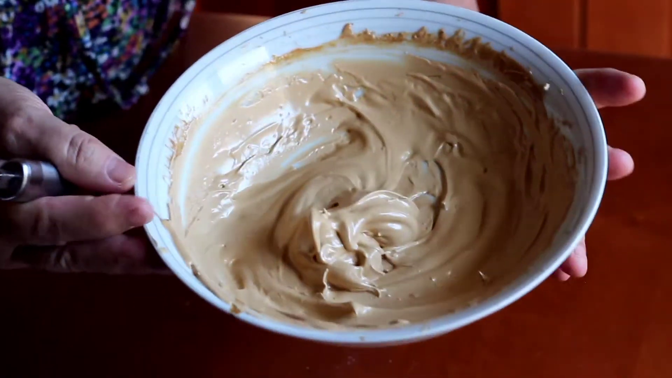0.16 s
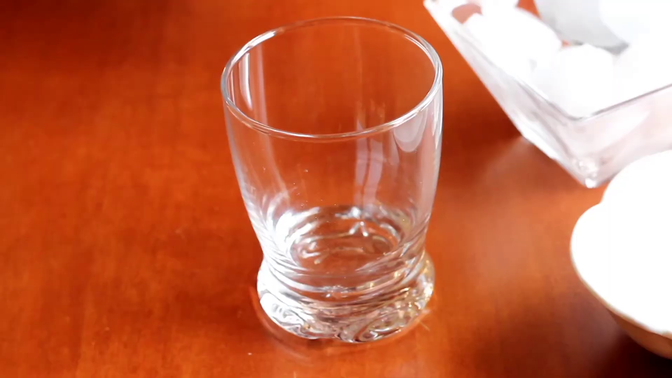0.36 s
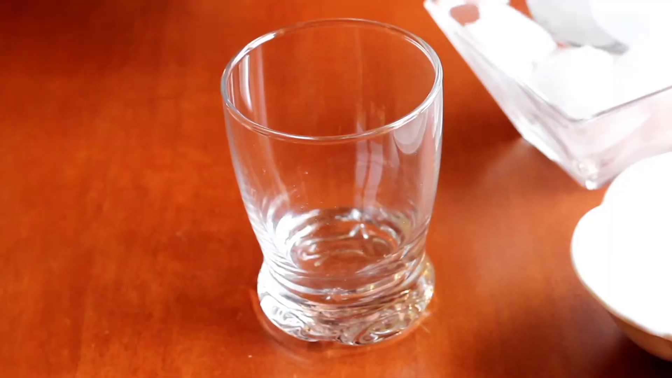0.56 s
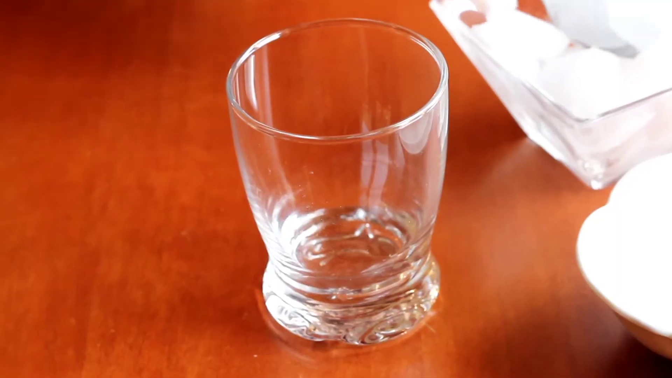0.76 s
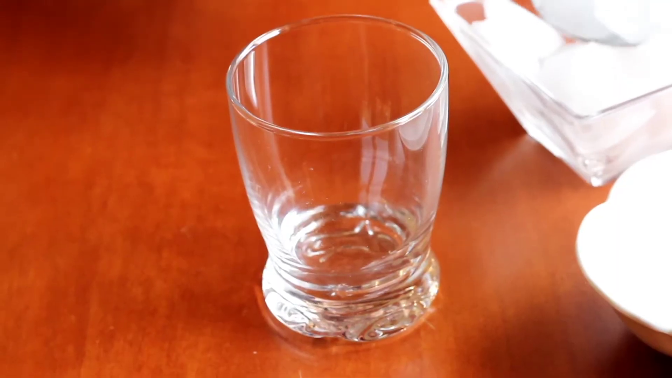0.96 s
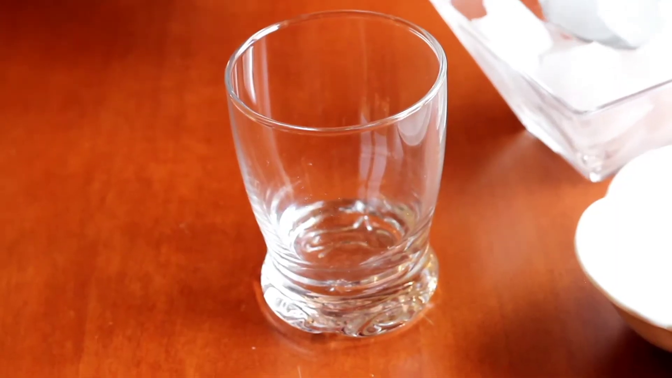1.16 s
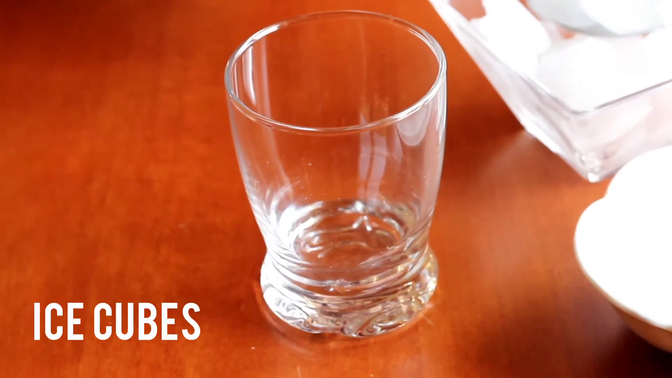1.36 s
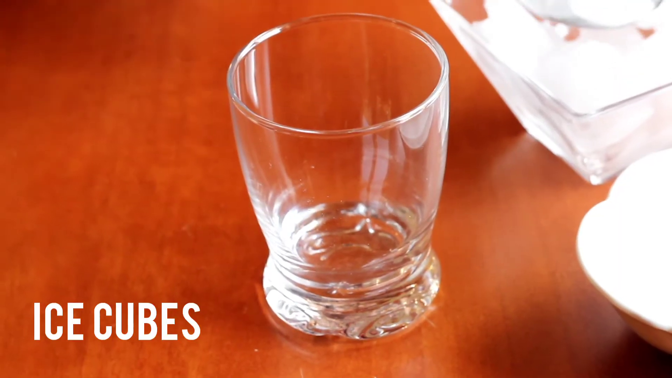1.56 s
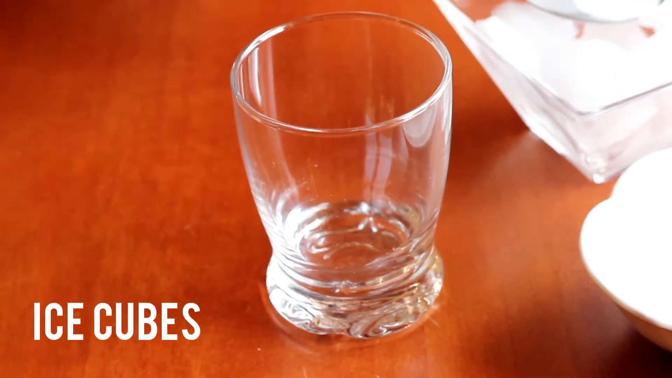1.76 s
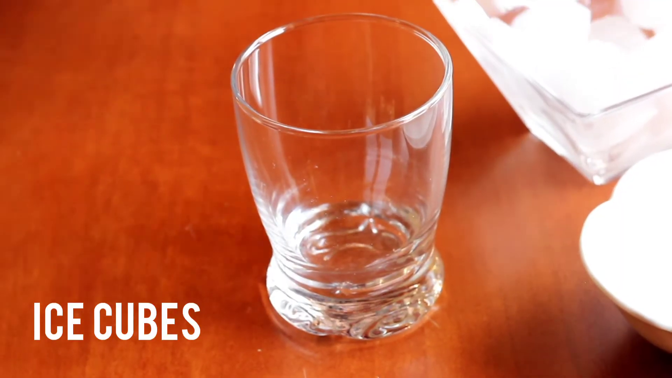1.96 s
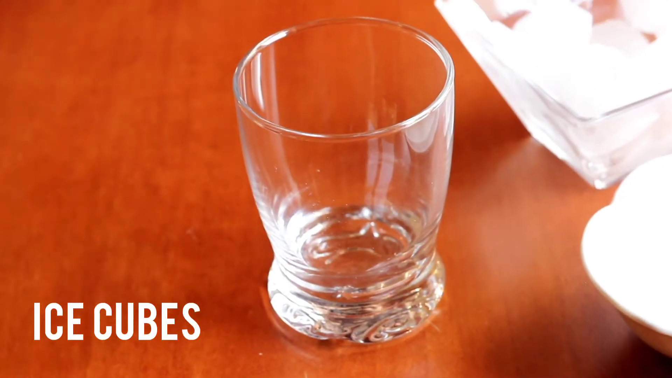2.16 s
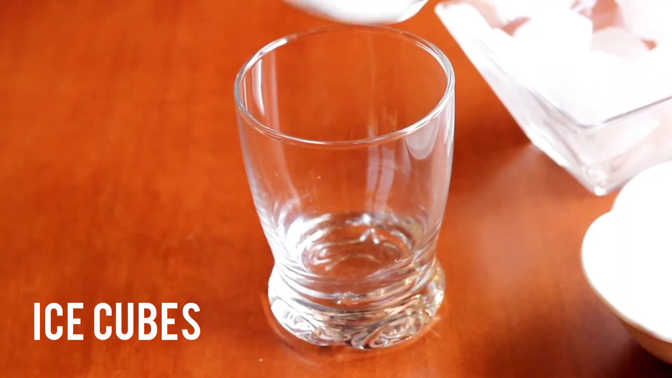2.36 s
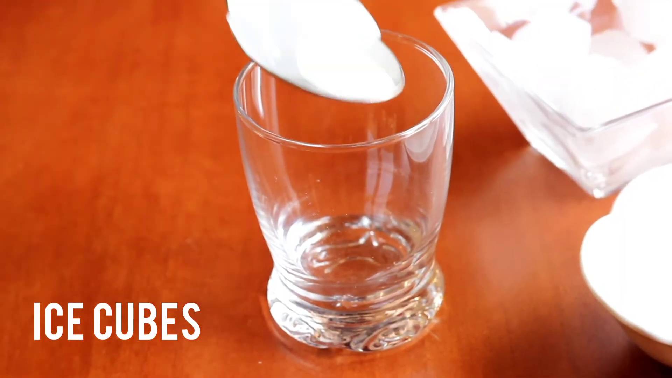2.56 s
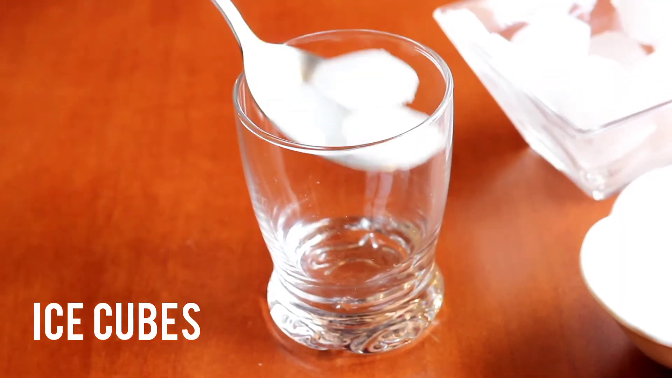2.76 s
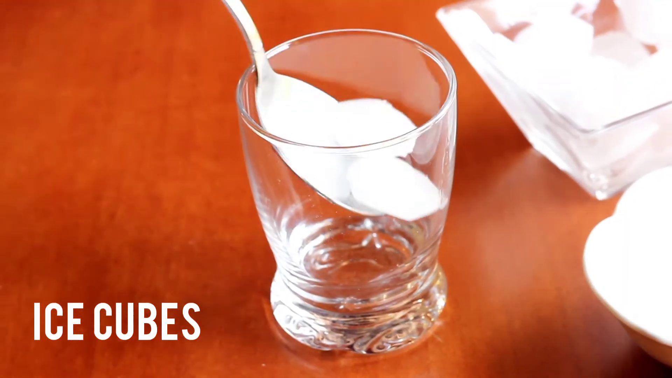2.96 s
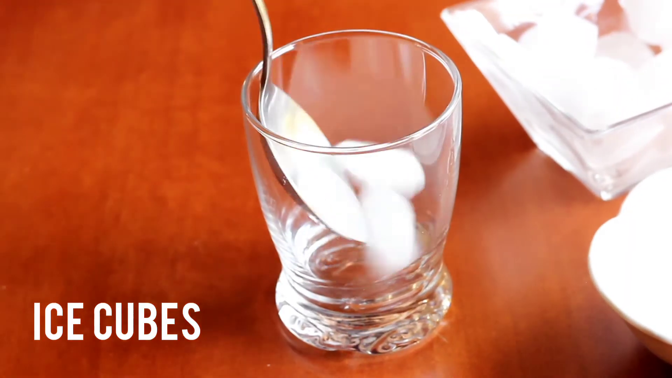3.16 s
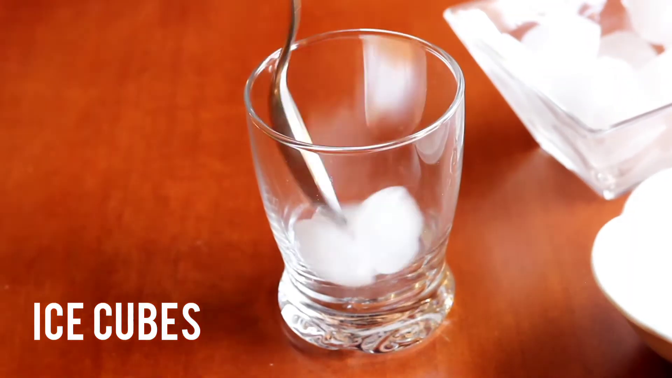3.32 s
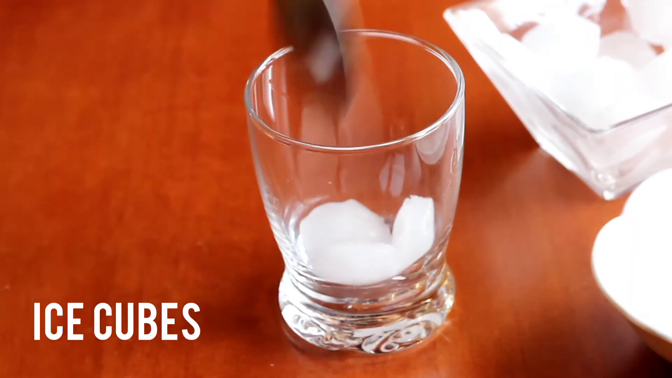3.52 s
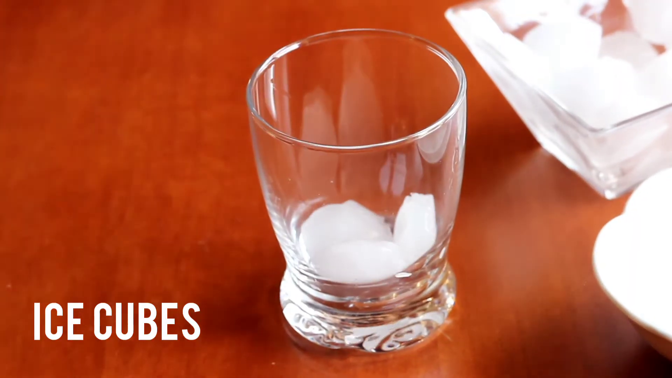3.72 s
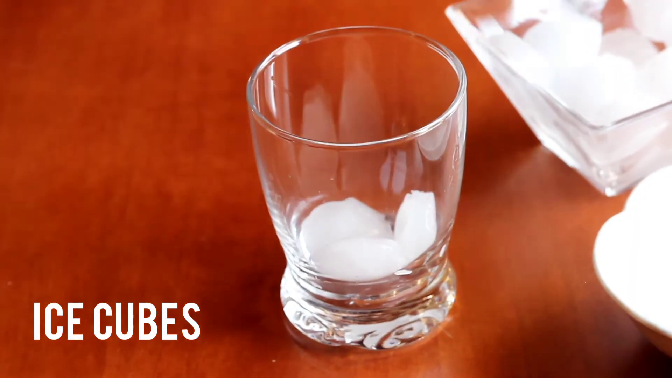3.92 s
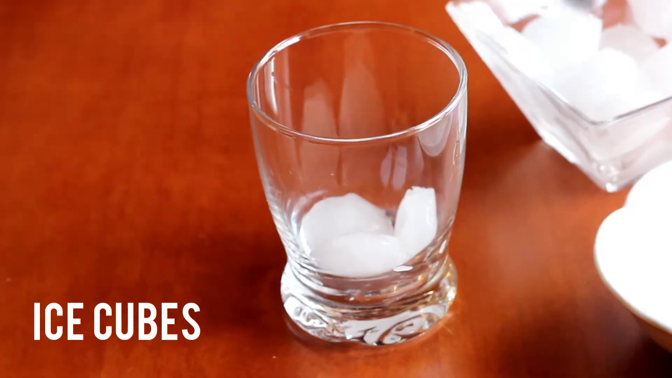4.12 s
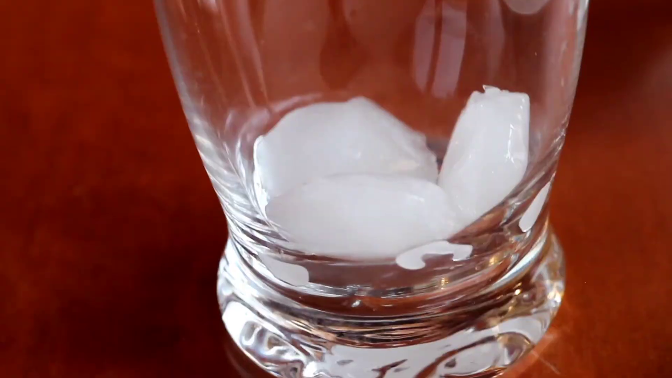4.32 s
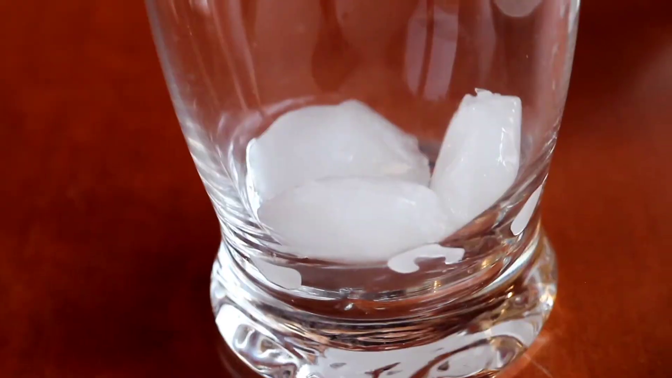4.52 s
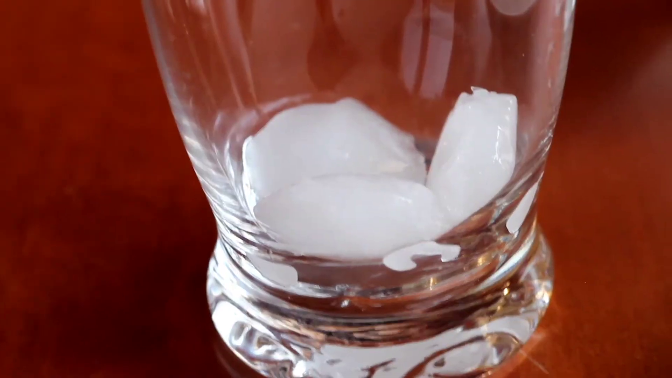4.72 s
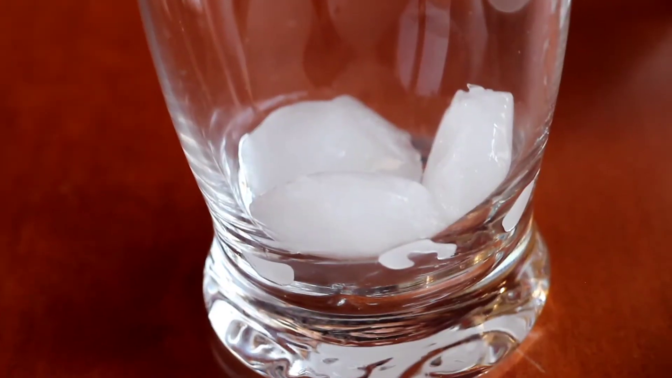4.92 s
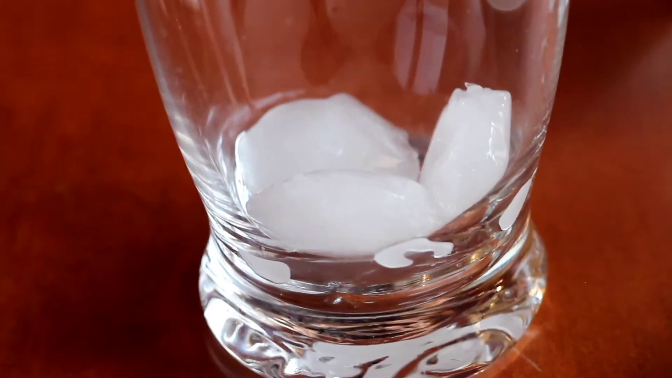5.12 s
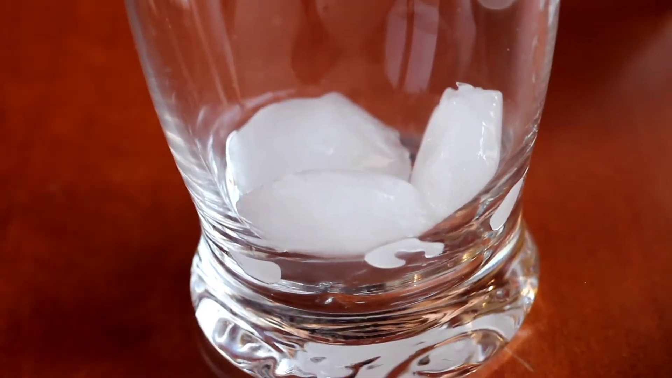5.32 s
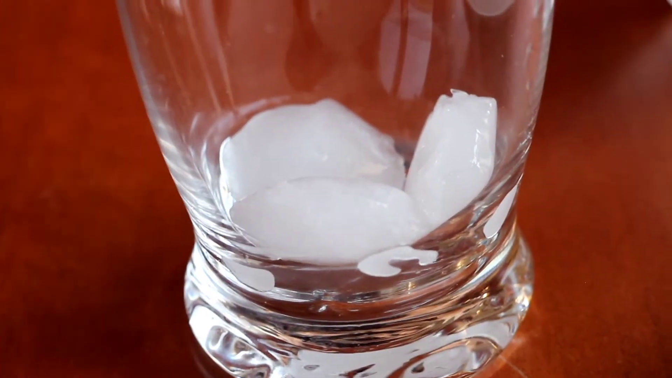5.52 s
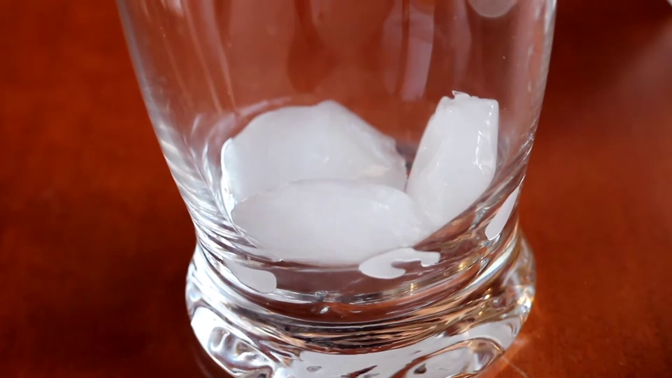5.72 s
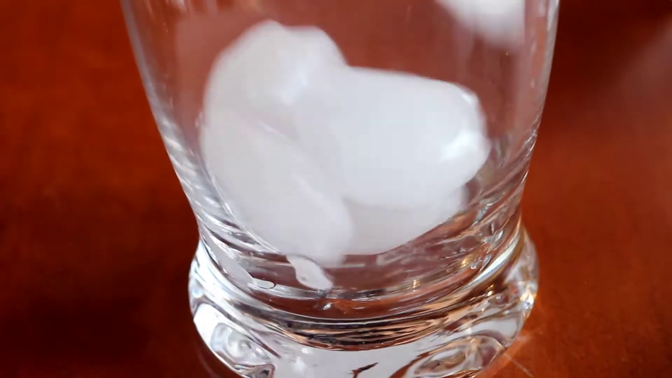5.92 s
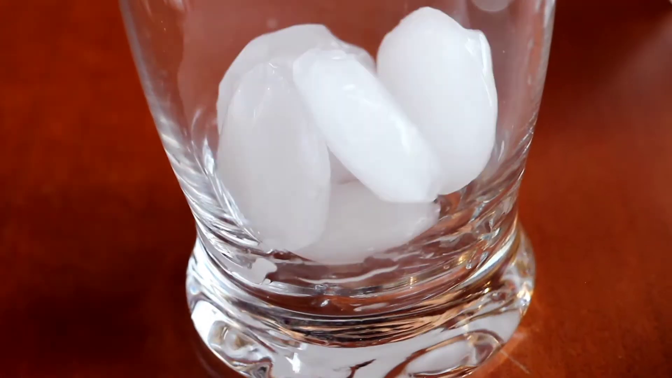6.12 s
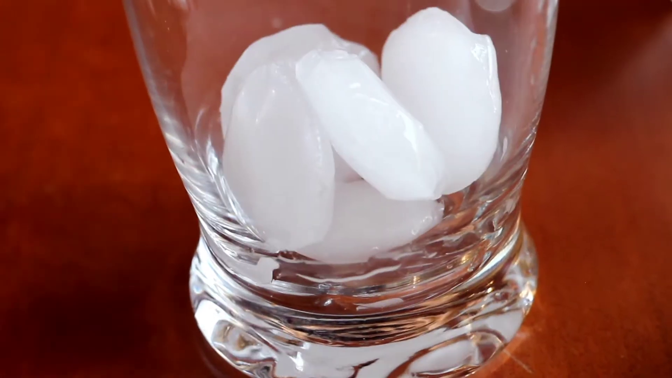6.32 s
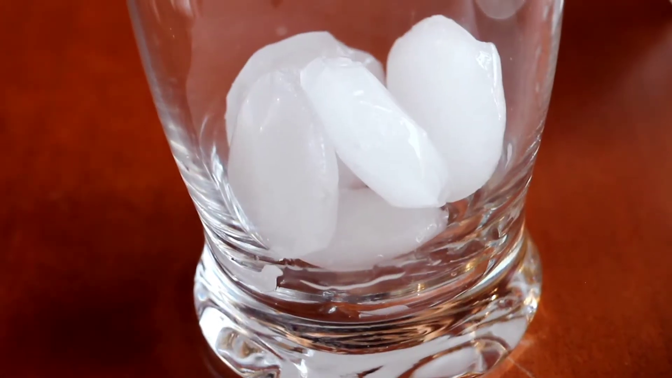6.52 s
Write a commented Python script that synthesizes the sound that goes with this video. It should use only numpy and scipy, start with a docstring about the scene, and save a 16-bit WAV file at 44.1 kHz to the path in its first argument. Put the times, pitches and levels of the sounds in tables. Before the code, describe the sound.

In a quiet kitchen, a metal spoon digs through ice in a glass bowl with small cracks, muted ticks and dull bumps on a wooden table. It taps a tumbler's rim sharply, then cubes slide in with a rattling clatter. After soft handling thumps and a near-silent gap, a second load drops in with brighter glassy clinks. The tumbler is close to the microphone; the bowl sounds more roomy.

```python
"""A quiet kitchen: ice cubes are spooned from a glass bowl into an empty tumbler on a wooden table.
The spoon rummages in the bowl, taps the tumbler's rim, and two spoonfuls tumble in.
Contacts mix short noise bursts for crack and knock with decaying sine modes for whatever rings.
Sliding ice is a stream of tiny noise slips; handling gives dull bumps that set the table humming.
Diffuse echoes and a bed of coloured noise surround it all."""
import sys
import numpy as np
from scipy import signal
from scipy.fft import rfft, irfft
from scipy.io import wavfile

SR = 44100
rng = np.random.default_rng(int(sys.argv[2]) if len(sys.argv) > 2 else 0)


def output_pcm(signal):
    """Save a mono or channel-first signal as 16-bit PCM at the path in sys.argv[1].

    Samples are clipped to [-1, 1] before scaling.
    """
    pcm = np.clip(np.atleast_2d(signal).T, -1, 1) * 32767
    wavfile.write(sys.argv[1], SR, np.round(pcm).astype(np.int16))


N = 290178
TIME = np.arange(N) / SR


def from_db(db):
    """Decibels to gain."""
    return 10 ** (np.asarray(db) / 20)


def rms_one(x):
    """Scale to unit power."""
    return x / np.sqrt(np.mean(x ** 2) + 1e-20)


def at_hz(points, hz):
    """Read a table on a log-frequency axis."""
    f, value = np.transpose(points)
    return np.interp(np.log(np.maximum(hz, 1)), np.log(f), value)


def add(out, s, sound):
    """Mix a sound in at time s."""
    at = int(round(s * SR))
    out[at:at + len(sound)] += sound[:N - at]


def noise(spectrum, size):
    """Noise of the given colour, unit power: shaped magnitudes with random phases."""
    hz = np.fft.rfftfreq(size, 1 / SR)
    phases = np.exp(2j * np.pi * rng.random(len(hz)))
    return rms_one(irfft(from_db(at_hz(spectrum, hz)) * phases, size))


def decaying(power, t60):
    """Swing of something that stores the energy put in and loses it steadily."""
    keep = from_db(-120 / (t60 * SR))   # energy kept per sample
    return np.sqrt(signal.lfilter([1], [1, -keep], power + 1e-24))


def burst(spectrum, t60, size=8192):
    """A crowd of heavily damped modes set off at once; starts at unit power."""
    fade = from_db(-60 * TIME[:size] / t60)
    no_push = signal.butter(2, 110, "high", fs=SR, output="sos")   # small bodies radiate no deep bass
    body = signal.sosfilt(no_push, noise(spectrum, size) * fade)
    return rms_one(body) * np.sqrt(np.mean(fade ** 2))


def ring(hits, modes, vary_db):
    """Each hit (t/s, level/dB) adds energy to every mode, more or less by where it lands."""
    (s, hit_db), out = np.transpose(hits), np.zeros(N)
    at = np.round(s * SR).astype(int)
    spot_db = vary_db * (2 * rng.random((len(s), len(modes))) - 1)
    for k, (hz, db, t60) in enumerate(modes):
        power = np.bincount(at, from_db(hit_db + db + spot_db[:, k]) ** 2, N)
        rise = np.exp(-2 * hz / SR)   # a mode takes about half a cycle to start
        swing = signal.lfilter([1 - rise], [1, -rise], decaying(power, t60))
        out += swing * np.sin(2 * np.pi * hz * TIME)
    # little is radiated below the lowest mode
    lowest = np.array(modes)[:, 0].min()
    return signal.sosfilt(signal.butter(2, lowest / 2, "high", fs=SR, output="sos"), out)


# an ice cube's own modes: (f as a multiple of its pitch, level/dB)
CUBE_MODES = [(0.742, -13.5), (0.998, -3.5), (1.102, -7.5), (1.221, -9.5)]


def cracks(rows, t60, low_db, top_db, ring_db, ring_t60):
    """A contact snaps, then the cube rings briefly; no two cubes have quite the same shape."""
    out, t = np.zeros(N), TIME[:4096]
    ratio, mode_db = np.transpose(CUBE_MODES)
    ring_fade = from_db(ring_db - 60 * t / ring_t60)
    for s, db, hz in rows:
        # a hump of noise around the crack's pitch, with a shelf on either side
        hump = [(hz / 20, low_db - 28), (hz / 2, low_db), (hz / 1.79, -3), (hz, 0),
                (hz * 1.41, -4), (hz * 1.42, top_db), (hz * 4, top_db - 15)]
        pitches = hz * ratio * (1 + 0.03 * rng.standard_normal(len(ratio)))
        cube = from_db(mode_db) @ np.sin(2 * np.pi * np.outer(pitches, t)) * ring_fade
        add(out, s, from_db(db) * (burst(hump, t60, size=4096) + cube))
    return out


def knocks(hits, spectrum, t60):
    """Each hit (t/s, level/dB) sets off one short noise burst of the given colour."""
    out = np.zeros(N)
    for s, db in hits:
        add(out, s, from_db(db) * burst(spectrum, t60))
    return out


# colour of the room's steady noise: (f/Hz, relative level/dB per Hz)
AIR_COLOUR = [(15, -23), (30, -9.5), (52, -4), (70, -6.5), (115, -6.5), (145, 5), (170, -2), (195, 1.5),
              (230, -6), (380, -7), (750, -9.5), (1500, -14), (5000, -20.5), (10000, -25), (16000, -24)]
AIR_DB = -61


def air():
    """The kitchen's quiet bed: steady coloured noise."""
    return from_db(AIR_DB) * noise(AIR_COLOUR, size=N)


# how long the kitchen's echoes last: (f/Hz, t60/s)
ROOM_T60 = [(100, 4), (250, 1.5), (500, 0.53), (1000, 0.5), (3000, 0.73), (7000, 0.35), (14000, 0.55)]
# how strong the echoes are: (f/Hz, level/dB)
ROOM_LEVEL = [(100, -21), (300, 5.5), (900, -1), (2200, 0.5), (4500, -1.5), (8000, -1), (14000, -7)]


def kitchen(x, delay_s, build_s):
    """Diffuse echoes build up after the first wall and die band by band, the bass last."""
    t = TIME[:SR]
    hz = np.fft.rfftfreq(SR, 1 / SR)
    white = rfft(noise([(20, 0), (20000, 0)], size=SR))
    octave = np.log2(np.maximum(hz, 1))
    onset = np.clip((t - delay_s) / build_s, 0, 1)
    response = np.zeros(SR)
    for centre in range(6, 15):   # octave bands from 64 Hz to 16384 Hz, overlapping
        band = irfft(white * np.maximum(1 - abs(octave - centre), 0), SR)
        fade = onset * from_db(-60 * t / at_hz(ROOM_T60, 2 ** centre))
        level = from_db(at_hz(ROOM_LEVEL, 2 ** centre))
        response += level * band * fade / np.sqrt(np.sum(fade ** 2))
    return signal.fftconvolve(x, response)[:N]


# dull bumps of handling: (t/s, level/dB before trim)
BUMPS = [(1.46, -50.5), (1.53, -47), (1.77, -51.5), (3.33, -53.5), (3.52, -50), (3.72, -57.5),
         (4.275, -54.5), (4.54, -62.5), (4.99, -61.5), (5.78, -50.5), (6.14, -50)]
# colour of a bump: (f/Hz, relative level/dB per Hz)
BUMP_COLOUR = [(50, -15), (100, 6.5), (150, -1), (205, -7.5), (265, -6), (330, -13.5), (420, -18),
               (700, -11), (2000, -56)]
# modes of the table: (f/Hz, level/dB before trim, t60/s)
TABLE_MODES = [(57.5, -20.5, 3), (145.7, -8, 1.03), (191, -13, 1.75), (262, -10, 2.6), (359, -10.5, 1.46),
               (404, -11.5, 0.87)]


def handling():
    """Dull bumps set the table's low modes humming. Returns bumps and hum."""
    bumps = from_db(-4) * knocks(BUMPS, BUMP_COLOUR, t60=0.27)
    hum = from_db(1) * ring(BUMPS, TABLE_MODES, vary_db=5)
    return bumps, hum


# spoon and ice in the bowl, before trims:
# (t/s, crack level/dB, crack f/Hz, knock level/dB, ring level/dB)
SCOOPS = [(0.3982, -54, 3880, -71, -62), (0.5126, -52.5, 2290, -75, -73), (0.5658, -47, 2900, -58, -60),
          (0.5937, -46, 2530, -49.5, -64), (0.793, -55, 2600, -57, -73), (0.9863, -38.5, 2640, -47, -50),
          (1.0137, -46, 3920, -55.5, -60), (1.2783, -37, 4230, -51.5, -42.5), (1.4164, -41, 4380, -64, -53),
          (1.4599, -42, 3400, -48.5, -58), (1.4782, -42, 3180, -54, -59), (1.514, -41, 3400, -50.5, -47),
          (1.5341, -36.5, 4320, -47, -50), (1.7524, -56, 1990, -54.5, -68), (1.7895, -47.5, 2590, -57, -63),
          (1.8263, -51, 1910, -58.5, -68), (3.959, -49, 2240, -52, -55)]
# modes of the glass bowl: (f/Hz, level/dB before trim, t60/s)
BOWL_MODES = [(1720, -19.5, 0.085), (2680, -23, 0.12), (4010, -15, 0.13), (4020, -10.5, 0.084),
              (4940, -17, .06), (8800, -5, 0.036)]
# colour of the bowl's knock: (f/Hz, relative level/dB per Hz)
BOWL_KNOCK = [(70, -26), (180, -8.5), (400, 2), (900, 0), (1250, -4), (1800, -2.5), (3000, -19),
              (6000, -17), (14000, -49)]


def bowl():
    """Digging in the full bowl, whose ring the ice mostly damps. Returns ticks and knocks."""
    scoops = np.array(SCOOPS)
    snap = cracks(scoops[:, :3], t60=0.012, low_db=-24, top_db=-16, ring_db=-2.5, ring_t60=0.019)
    chime = ring(scoops[:, [0, 4]], BOWL_MODES, vary_db=2)
    thuds = from_db(4) * knocks(scoops[:, [0, 3]], BOWL_KNOCK, t60=0.078)
    return from_db(5) * snap + from_db(3) * chime, thuds


# cubes sliding over each other, in the bowl and then in the tumbler:
# (start t/s, length/s, level/dB before attack, friction and trim)
SLIDES = [(0.41, 0.053, -61.5), (0.57, .06, -60), (0.848, 0.093, -62), (0.97, 0.047, -47),
          (1.425, .09, -56), (1.52, 0.045, -47.5), (3.152, .04, -48), (3.197, 0.28, -33.5),
          (5.714, .09, -45), (5.946, .07, -44)]
SLIDE_ATTACK_S, FRICTION_DB_PER_S, SETTLE_DB_PER_S = 0.029, 47.5, 150


def slide_swell(start, length, db):
    """A slide gathers speed, is slowed by friction, then settles: attack, sagging hold, release."""
    age = np.maximum(TIME - start, 0)
    loss_db = FRICTION_DB_PER_S * age + SETTLE_DB_PER_S * np.maximum(age - length, 0)
    return np.minimum(age / SLIDE_ATTACK_S, 1) * from_db(db - loss_db)


# colour of a slip: (f/Hz, relative level/dB per Hz)
SLIP_COLOUR = [(100, -43), (400, -12), (1500, -6.5), (2800, 1), (5000, -2), (6500, -7.5), (9000, -15.5),
               (15000, -28)]


def sliding(per_s, t60):
    """Ice rubbing on ice: a stream of tiny equal slips at random moments, each dying away."""
    slips = (rng.random(N) < per_s / SR).astype(float)
    grain = rms_one(decaying(slips, t60) * noise(SLIP_COLOUR, size=N))
    swell = np.max([slide_swell(*slide) for slide in SLIDES], axis=0)   # the strongest slide wins
    return from_db(-2.5) * grain * swell


# loaded spoon on the rim, before trims:
# (t/s, crack level/dB, crack f/Hz, knock level/dB, ring level/dB)
TAPS = [(2.7030, -32.5, 4380, -35.5, -31), (2.7107, -28, 3980, -28, -46), (2.7299, -38.5, 6500, -40, -60)]
# colour of the rim's knock: (f/Hz, relative level/dB per Hz)
RIM_KNOCK = [(50, -42), (150, -31), (300, -13), (420, -4.5), (600, -16), (740, -3), (840, 4), (1050, -7.5),
             (1400, -13), (1900, -32), (2800, -45), (12000, -45)]
# damped modes of the tumbler standing on the table top: (f/Hz, level/dB before trim, t60/s)
STAND_MODES = [(430, -6.5, 0.059), (572.6, -11.5, 0.13), (660.5, -9, 0.057), (767.4, -2, .04),
               (838, 0.5, 0.026), (993, -8, .045), (1069, -1, 0.055)]
# modes of the spoon: (f/Hz, level/dB, t60/s)
SPOON_MODES = [(2260, -20.5, 0.25), (5160, -10, 0.11), (5270, -22, 0.13), (6030, -15, 0.17),
               (6470, -2.5, 0.039), (6750, -12, 0.11), (6900, -8, 0.076), (9500, -8, 0.081),
               (9490, -8, .09), (9570, -8, 0.19), (11400, -10, 0.11), (12300, -16, 0.11), (12620, -14, .12),
               (13510, -9, .08), (13600, -12, 0.091), (15400, -25, .14)]


def spoon():
    """The loaded steel spoon taps the rim and rings. Returns contacts and ringing."""
    taps = np.array(TAPS)
    snap = cracks(taps[:, :3], t60=0.019, low_db=-9.5, top_db=-3.5, ring_db=-18, ring_t60=0.014)
    knock = knocks(taps[:, [0, 3]], RIM_KNOCK, t60=0.11)
    stand = ring(taps[:, [0, 3]], STAND_MODES, vary_db=0)
    steel = ring(taps[:, [0, 4]], SPOON_MODES, vary_db=6.5)
    return from_db(3) * snap + knock + from_db(-7.5) * stand, steel


# ice on the tumbler, before trims: (t/s, crack level/dB, crack f/Hz, knock level/dB,
# first wall mode level/dB, second wall mode level/dB, base modes level/dB)
DROPS = [(3.1411, -70, 5830, -56, -52.5, -68, -58), (3.1869, -45, 4200, -30.5, -49, -70, -63),
         (3.2111, -41, 4000, -41, -49, -41, -47), (3.2168, -31.5, 5350, -51, -30, -41, -34.5),
         (3.2275, -34, 4500, -47, -44, -51, -52), (3.2408, -35, 5000, -54, -37, -45, -56),
         (3.2756, -41, 3800, -47, -33.5, -59, -53), (3.2893, -30, 3990, -36.5, -44, -59, -50),
         (3.3146, -35, 4560, -36.5, -64, -27, -37.5), (3.3297, -36, 6600, -44, -59, -50, -50),
         (3.3968, -35, 3830, -42.5, -60, -58, -64), (3.4139, -38, 5150, -55, -60, -55, -57),
         (3.4458, -40, 5240, -50, -42.5, -48, -59.5), (5.733, -44, 3200, -45.5, -31.5, -29.5, -52),
         (5.7585, -37, 4500, -43, -34, -26, -44.5), (5.7729, -32, 4720, -24, -22.5, -64, -44),
         (5.7905, -32.5, 4300, -58, -28, -24.5, -70), (5.8346, -39, 4240, -63, -42, -29.5, -75),
         (5.8441, -34.5, 4260, -44.5, -54, -44, -75), (5.8676, -35, 4140, -40.5, -52, -48, -55),
         (5.8933, -40, 3270, -44, -55, -53, -75), (5.9618, -24.5, 3890, -33, -33.5, -43, -40.5),
         (5.9687, -30, 4940, -44, -48, -39, -63), (6.0292, -56, 3540, -43.5, -59, -63, -50),
         (6.0595, -41, 3550, -40.5, -43.5, -48, -73), (6.0709, -37.5, 4100, -42, -60, -66, -56),
         (6.1032, -39, 3840, -51.5, -64, -71, -64)]
# colour of the knock passed into the table top: (f/Hz, relative level/dB per Hz)
TUMBLER_KNOCK = [(70, -36), (150, -18), (290, -10), (430, -5), (640, -5), (820, -4), (1080, 2),
                 (1400, -15.5), (1900, -24), (2800, -9.5), (5000, -61), (12000, -68)]
# the sharp edge of a hard contact: (f/Hz, relative level/dB per Hz)
HARD_EDGE = [(1000, -17), (4000, 4), (7000, -25), (10000, 8.5), (13000, 3), (16000, -8)]
# the tumbler is not quite round, so its modes come in close, beating groups;
# all four mode tables: (f/Hz, level/dB before trim, t60/s)
FIRST_WALL = [(2249, -1.5, 0.54), (2269, -13, 0.81), (2280, -9.5, 0.52)]
SECOND_WALL = [(3507, 2.5, 0.32), (3484, -19, 1)]
UPPER_WALL = [(6080, -2.5, 0.32), (6046, -9.5, 0.39), (9400, -7.5, 0.28), (9300, -9, 0.17),
              (13510, -9, 0.25)]
BASE = [(11500, -0.5, 0.15), (12420, 7.5, 0.062), (11970, -8, 0.15), (13000, -14, 0.12), (14300, -24, 0.14),
        (14300, -19, 0.11), (15290, -15, 0.13)]
UPPER_BASE_SHARE = 0.58   # upper wall modes are driven by a blend of second wall and base levels


def tumbler():
    """Cubes strike wall and base, waking different modes. Returns cracks, knocks and ringing."""
    drops = np.array(DROPS)
    s, second_db, base_db = drops[:, 0], drops[:, 5], drops[:, 6]
    upper_db = (1 - UPPER_BASE_SHARE) * second_db + UPPER_BASE_SHARE * base_db
    knock_hits, base_hits = drops[:, [0, 3]], drops[:, [0, 6]]

    snap = cracks(drops[:, :3], t60=0.021, low_db=-41, top_db=-21, ring_db=-2.5, ring_t60=0.03)
    edge = knocks(base_hits, HARD_EDGE, t60=0.014)
    snaps = from_db(4) * snap + from_db(5.5) * edge

    thud = knocks(knock_hits, TUMBLER_KNOCK, t60=0.031)
    stand = ring(knock_hits, STAND_MODES, vary_db=2)
    knock = from_db(3.5) * thud + from_db(-3) * stand

    ringing = from_db(0.5) * ring(drops[:, [0, 4]], FIRST_WALL, vary_db=2)
    ringing += from_db(0.5) * ring(drops[:, [0, 5]], SECOND_WALL, vary_db=0)
    ringing += from_db(-1.5) * ring(np.column_stack([s, upper_db]), UPPER_WALL, vary_db=2.5)
    ringing += ring(base_hits, BASE, vary_db=8)
    return snaps, knock, ringing


def scene():
    """The tumbler is heard close by; bowl knocks and table bumps come more through the room."""
    bumps, hum = handling()
    ticks, thuds = bowl()
    rubbing = sliding(per_s=400, t60=0.015)
    tap, steel = spoon()
    snaps, knock, ringing = tumbler()
    # each sound with its send into the room, in dB
    sounds = [(bumps, 6.5), (ticks, -0.5), (thuds, 5.5), (rubbing, -8.5), (tap, -3), (steel, 0),
              (snaps, -4.5), (knock, 2), (ringing, -17)]
    direct = sum(sound for sound, send_db in sounds) + hum
    sent = sum(sound * from_db(send_db) for sound, send_db in sounds)
    echoes = kitchen(sent, delay_s=0.004, build_s=0.0041)
    return (direct + echoes + air())[None]


CUTOFF_HZ = 15900


def record(dry):
    """A steep elliptic low-pass takes off the extreme treble."""
    low_pass = signal.ellip(10, .2, 70, CUTOFF_HZ, fs=SR, output="sos")
    return signal.sosfilt(low_pass, dry)


dry = scene()
out = record(dry)
output_pcm(out)
```